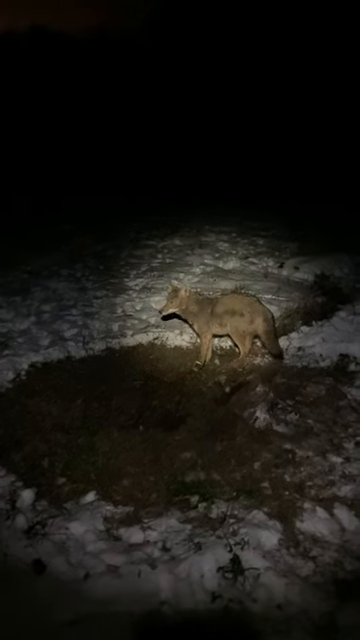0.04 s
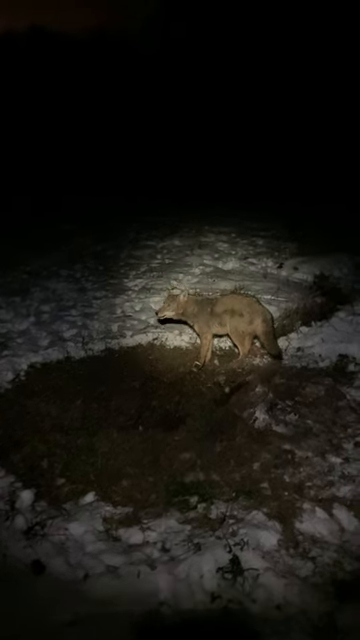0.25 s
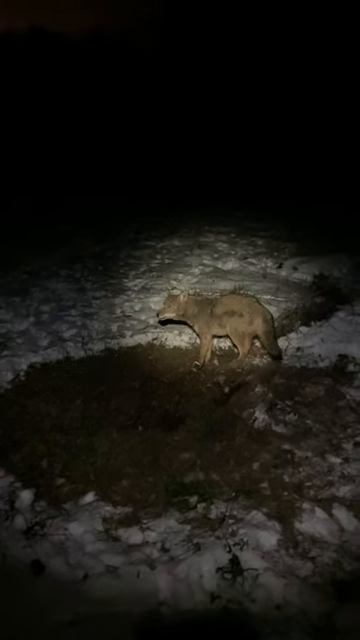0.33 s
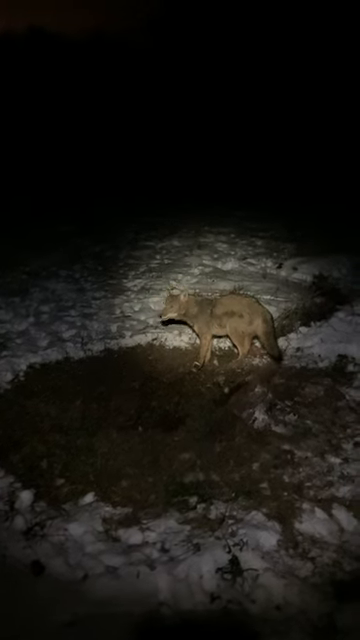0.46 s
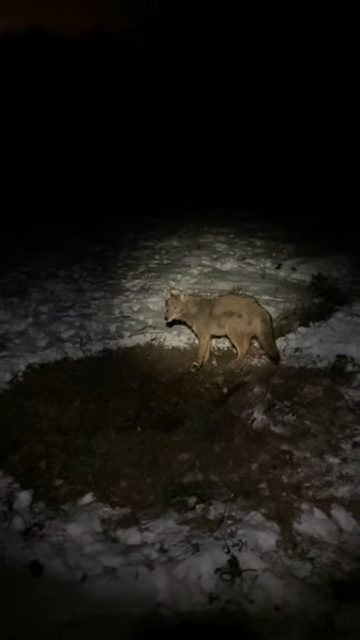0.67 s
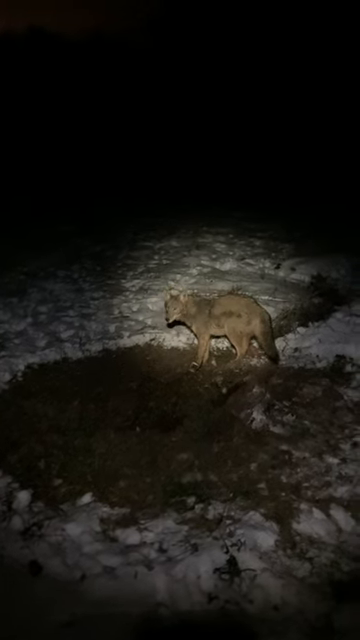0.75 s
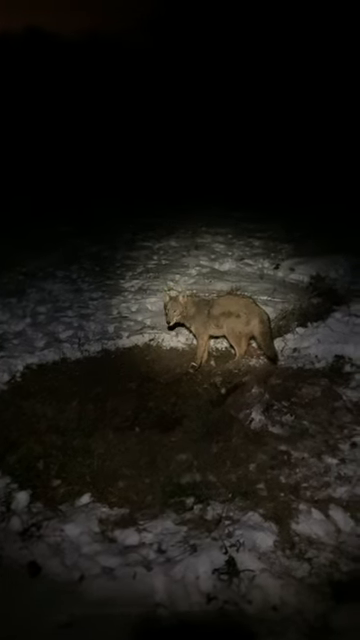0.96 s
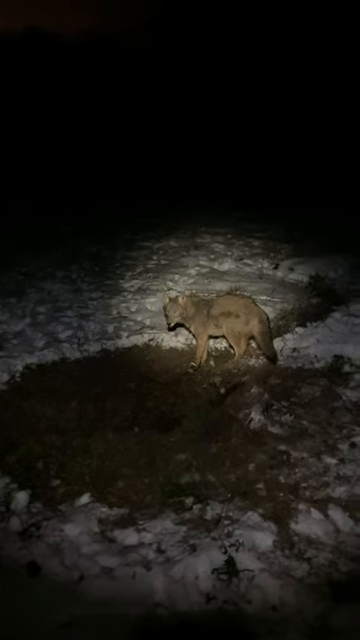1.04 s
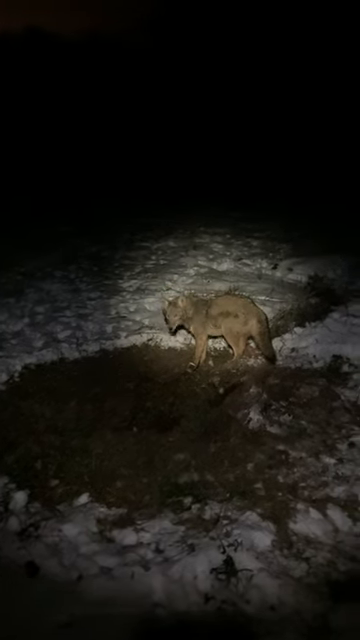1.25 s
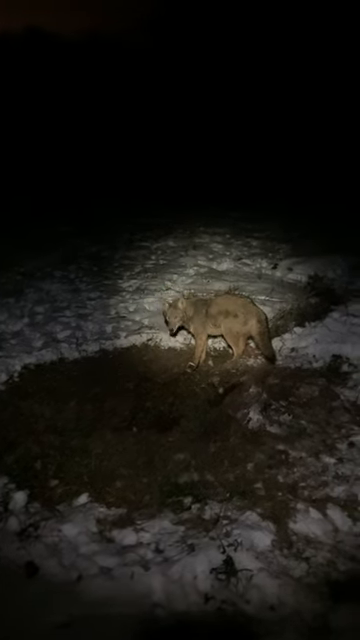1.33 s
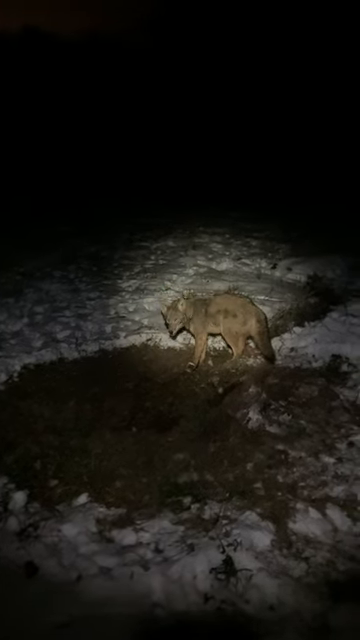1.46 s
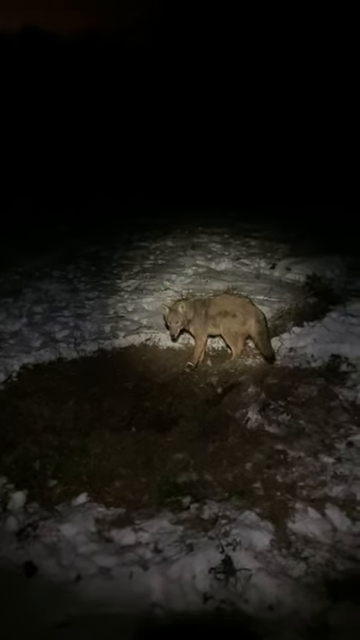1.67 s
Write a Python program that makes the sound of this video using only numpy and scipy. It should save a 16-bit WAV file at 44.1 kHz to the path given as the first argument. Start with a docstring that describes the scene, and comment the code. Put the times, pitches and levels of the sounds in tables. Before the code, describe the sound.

A coyote lets out a loud, raspy yip that falls into a thin howl and sinks to a faint hum. A second yip follows with a short trailing howl, echoing faintly over quiet open ground at night.

```python
"""Night on open ground: a quiet low rumble, and a distant ring dying in the air. A coyote barks twice,
its vocal folds driving throat and mouth. A low grunt breaks into a loud raspy yip, then clears into a thin
falling howl with a high whistle riding on it. The land returns a faint long echo while the howl sinks
to a closed-mouth hum. The hum lasts until the second grunt, whose yip has a soft low thud under it
and trails off in a short howl."""
import sys
import numpy as np
from scipy import signal
from scipy.fft import rfft, irfft, next_fast_len
from scipy.io import wavfile
from scipy.ndimage import uniform_filter1d, minimum_filter1d

SR = 44100
rng = np.random.default_rng(int(sys.argv[2]) if len(sys.argv) > 2 else 0)


def file_out(sig):
    """Save sig as 16-bit WAV at sys.argv[1]."""
    # one column per channel
    cols = np.atleast_2d(sig).T
    # limit, then scale
    lim = np.clip(cols, -1, 1)
    pcm = np.round(lim * 32767).astype(np.int16)
    wavfile.write(sys.argv[1], SR, pcm)


N = 74970
T = np.arange(N) / SR
FFT_SIZE = 2 * next_fast_len(N)
HZ = np.maximum(np.arange(FFT_SIZE // 2 + 1) * SR / FFT_SIZE, 1)


def from_db(db):
    """Decibels to gain."""
    return 10 ** (np.asarray(db) / 20)


def unit_rms(x):
    """Scale to unit power."""
    return x / np.sqrt(np.mean(x ** 2) + 1e-20)


def at_hz(curve, hz):
    """Read a curve on a log-frequency axis."""
    freq_hz, value = np.transpose(curve)
    return np.interp(np.log(hz), np.log(freq_hz), value)


def filtered(x, response):
    """Apply a frequency response."""
    return irfft(rfft(x, FFT_SIZE) * response)[..., :N]


def noise(colour_db, pulsing=1):
    """Unit-power noise, pulsed at its source if wished, then coloured."""
    return unit_rms(filtered(rng.standard_normal(N) * pulsing, from_db(colour_db)))


def drift(rate_hz):
    """Unit-power random wander, mostly slower than the given rate."""
    return noise(-20 * np.log10(1 + (HZ / rate_hz) ** 2))


def phase_of(hz):
    """Running phase of a gliding pitch."""
    return 2 * np.pi * np.cumsum(hz) / SR


# Colour of the night air: freq_hz, relative_db
NIGHT_COLOUR = [(20, -19), (40, -9), (65, -0.5), (125, -17), (230, -18), (500, -11), (1000, -26),
                (2000, -41), (4000, -43.5), (8500, -41), (15000, -53)]
def night_rumble(level_db=-65.5):
    """A steady, bass-heavy bed of noise."""
    return from_db(level_db) * noise(at_hz(NIGHT_COLOUR, HZ))


# Colour of the distant ring: freq_hz, relative_db
RING_COLOUR = [(250, -38), (400, -20.5), (470, 3), (540, -17.5), (720, -24.5), (850, -8), (950, -32),
               (1140, -23), (1400, -45), (4000, -73)]
def distant_ring(level_db=-67.5, t60_s=3.9):
    """Narrow bands of noise, already in the air at the start and fading."""
    return from_db(level_db - 60 * T / t60_s) * noise(at_hz(RING_COLOUR, HZ))


# Resonances of the open throat and mouth: freq_hz, gain_db
OPEN_THROAT = [(200, -34), (400, -19), (560, -8.5), (720, 0), (950, -3.5), (1130, 7), (1280, -9.5),
               (1450, -1), (1650, 0), (1780, -1.5), (1950, -0.5), (2250, -11), (2520, -24.5), (2850, -12.5),
               (3100, -28), (3400, -19.5), (4300, -30.5), (5100, -29.5), (5700, -29), (6700, -19),
               (7700, -29.5), (8900, -21.5), (11000, -35.5), (15500, -41)]
# Resonances with the mouth narrowed for the howl: freq_hz, gain_db
HOWL_MOUTH = [(460, 8), (600, -3), (740, 4), (930, 7), (1020, -5.5), (1100, -16.5), (1260, -15.5),
              (1450, -4.5), (1620, 3), (1780, -8), (1930, -3.5), (2200, -31), (2550, -32), (2870, -20.5),
              (3250, -42.5), (4500, -50.5), (6000, -31.5)]
# Colour of the rasp before the throat: freq_hz, gain_db
RASP_COLOUR = [(60, -12.5), (200, -3.5), (500, 8.5), (900, -3), (1600, 1), (3000, 0), (15000, 0.5)]
WAVER_DEPTH, WAVER_HZ = .008, 35   # slow unsteadiness of pitch
JITTER_DEPTH, SHIMMER_DB, JITTER_HZ = .07, 2.5, 223   # uneven pitch and level at full roughness
FLUTTER_DB, FLUTTER_HZ = 2.5, 25.03   # each overtone flickers on its own
CHEST_HZ, MOUTH_RANGE_DB, RASP_PULSE_DEPTH = 720, 13.5, 0.59
def voice(gesture, fall_db_per_octave, chest_db, mouth_opens_db):
    """Vocal folds drive the throat; as they roughen, cycles turn uneven and rasp replaces overtones."""
    time_s, *columns = np.transpose(gesture)
    pitch_hz, fundamental_db, overtones_db, roughness = [np.interp(T, time_s, c) for c in columns]
    roughness = np.clip(roughness, 0, .95)
    gate = np.clip(np.minimum(T - time_s[0], time_s[-1] - T) / .004 + 1, 0, 1)
    # The mouth opens as the overtones grow louder.
    openness = np.clip((overtones_db - mouth_opens_db) / MOUTH_RANGE_DB, 0, 1)
    phase = phase_of(pitch_hz * (1 + WAVER_DEPTH * drift(WAVER_HZ)))
    jitter = phase_of(pitch_hz * JITTER_DEPTH * roughness * drift(JITTER_HZ))
    overtones, power = 0, 0
    for harmonic in range(2, 13):
        hz = harmonic * pitch_hz
        mouth_db = openness * at_hz(OPEN_THROAT, hz) + (1 - openness) * at_hz(HOWL_MOUTH, hz)
        low_lift_db = chest_db * np.exp(-(hz / CHEST_HZ) ** 2)
        gain = from_db(mouth_db - fall_db_per_octave * np.log2(harmonic) + low_lift_db)
        flicker = np.interp(T * FLUTTER_HZ, np.arange(200), rng.standard_normal(200))
        partial = np.cos(harmonic * (phase + jitter) + rng.uniform(0, np.pi))
        overtones += gain * from_db(FLUTTER_DB * flicker) * partial
        power += gain ** 2 / 2
    rasp_db = at_hz(OPEN_THROAT, HZ) + at_hz(RASP_COLOUR, HZ) + chest_db * np.exp(-(HZ / CHEST_HZ) ** 2)
    rasp = noise(rasp_db, pulsing=1 + RASP_PULSE_DEPTH * np.cos(phase))
    edge = np.sqrt((1 - roughness ** 2) / power) * overtones + roughness * rasp
    shimmer = from_db(SHIMMER_DB * roughness * drift(JITTER_HZ))
    fundamental = np.sqrt(2 * shimmer) * np.sin(phase + .35 * jitter)   # steadier than its overtones
    return gate * (from_db(fundamental_db) * fundamental + from_db(overtones_db) * shimmer * edge)


# One gesture per grunt: time_s, pitch_hz, fundamental_db, overtones_db, roughness (0-1)
GRUNT_GESTURES = [
    [(.183, 145, -54.5, -68.5, .9), (.194, 165.2, -42, -55.5, 0.8), (.203, 173, -31, -40, 0.7),
     (.22, 204, -54.5, -45.5, .8)],
    [(1.37, 115.1, -51.5, -66.5, 0.8), (1.412, 129.8, -38, -48.5, 0.2), (1.435, 177.6, -31, -34.5, .75),
     (1.458, 218.9, -31, -30.5, 0.6), (1.472, 220, -53.5, -44.5, .7)],
]
def grunts():
    """A rough, chesty rise in pitch leads into each yip."""
    return sum(voice(gesture, fall_db_per_octave=4, chest_db=25.5, mouth_opens_db=-42.5)
               for gesture in GRUNT_GESTURES)


# First yip, howl and hum: time_s, pitch_hz, fundamental_db, overtones_db, roughness (0-1)
FIRST_YIP = [(.204, 430.2, -39.5, -38, .8), (.211, 463.6, -22.5, -23.5, 0.57), (.23, 482.7, -10, -13, 0.41),
             (.24, 515.6, -12.5, -13, .65), (.252, 534.2, -13.5, -16, .6), (.274, 571.3, -21.5, -14.5, .17),
             (.286, 535.7, -22.5, -20.5, .25), (.298, 498, -24.5, -33, 0.26),
             (.322, 464.5, -35.5, -30.5, .05), (.35, 442, -42.5, -41, 0.05),
             (.39, 396.6, -52.5, -41.5, 0.01), (.48, 375.3, -57, -45, 0.04), (.67, 353, -61.5, -48.5, 0.06),
             (.75, 333.9, -54, -61, .05), (.91, 305.6, -50, -59, .05), (1.0, 243, -43, -65, .05),
             (1.06, 235.4, -43.5, -66.5, .05), (1.36, 232.6, -42.5, -70.5, .05),
             (1.39, 207.2, -49.5, -73, .05)]
# Second yip and short howl: time_s, pitch_hz, fundamental_db, overtones_db, roughness (0-1)
SECOND_YIP = [(1.455, 420.5, -37, -39, .7), (1.466, 469.2, -22, -20, .45), (1.482, 481.7, -11, -17.5, 0.67),
              (1.497, 504, -26, -16.5, .9), (1.512, 495.2, -23.5, -22, 0.57), (1.528, 471, -24, -27, .5),
              (1.541, 429.6, -25, -35, 0.068), (1.58, 389.6, -45, -40, .03), (1.62, 353.7, -61, -48, 0.039),
              (1.665, 324.6, -58, -54, .03), (1.7, 326, -50, -54.5, 0.028)]
def yips_and_howls():
    """Each yip bursts from an open mouth, then clears and falls as the mouth narrows."""
    return sum(voice(gesture, fall_db_per_octave=4.5, chest_db=0, mouth_opens_db=-31)
               for gesture in (FIRST_YIP, SECOND_YIP))


# Path of the whistle riding on the voice: time_s, pitch_hz, level_db
WHISTLE_PATH = [(0.322, 5900, -71.5), (.55, 5700, -78), (.66, 5930, -80), (.92, 5614, -71.5),
                (1.05, 5350, -81), (1.39, 5250, -90), (1.43, 5100, -59), (1.459, 5320, -61),
                (1.472, 5400, -35), (1.49, 5590, -60), (1.539, 5400, -77.5), (1.7, 5400, -86)]
def whistle(width_hz=90):
    """A thin unsteady whistle far above the howl, flaring on the second yip."""
    time_s, pitch_hz, level_db = np.transpose(WHISTLE_PATH)
    phase = phase_of(np.interp(T, time_s, pitch_hz))
    tone = drift(width_hz) * np.cos(phase) + drift(width_hz) * np.sin(phase)
    return (T > time_s[0]) * from_db(np.interp(T, time_s, level_db)) * unit_rms(tone)


def scatter(x, t60_s, build_s, gain_db):
    """Countless small reflections that build up and die away."""
    tail = rng.standard_normal(N) * (1 - np.exp(-T / build_s)) * from_db(-60 * T / t60_s)
    return filtered(x, rfft(unit_rms(tail) / np.sqrt(N), FFT_SIZE) * from_db(gain_db))


# Colour of the land's echo: freq_hz, gain_db
ECHO_COLOUR = [(100, -17.5), (300, -5.5), (420, -5), (540, 0.5), (800, -0.5), (1000, -12.5), (1150, -5.5),
               (1400, -8), (1800, -13), (2400, -29), (3000, -23.5), (8000, -14), (15000, -24)]
def land_echo(coyote, send_db=-38):
    """The land returns the barks as a faint long tail."""
    return scatter(coyote, t60_s=3.2, build_s=0.085, gain_db=send_db + at_hz(ECHO_COLOUR, HZ))


# Colour of the thud under the second bark: freq_hz, relative_db
THUD_COLOUR = [(20, -2.5), (55, 0), (110, -8), (200, -16.5), (400, -31), (1500, -94)]
def thud(start_s=1.492, level_db=-39.5, attack_s=0.0037, decay_s=0.035):
    """A dull puff of bass that dies quickly, different in each ear."""
    age_s = np.maximum(T - start_s, 0)
    puff = np.array([noise(at_hz(THUD_COLOUR, HZ)) for _ in range(2)])
    return from_db(level_db) * puff * (1 - np.exp(-age_s / attack_s)) * np.exp(-age_s / decay_s)


# Phase between the two microphone ports: freq_hz, left_lead_rad
STEREO_PHASE = [(100, 0.5), (250, -1), (480, -1.6), (860, -3), (1250, -3.5), (1800, -4), (2600, -4),
                (2850, -6), (3200, -11), (3900, -9), (5400, -10.5), (6100, -8.5), (7900, -7), (9400, -5.5),
                (11000, -3.5), (12800, -3), (14000, -0.5)]
# Balance between the ports: freq_hz, left_minus_right_db
STEREO_BALANCE = [(100, 1), (240, 0.5), (340, -8.5), (490, -3), (620, 0), (1600, 1), (2700, -3), (6000, .5)]
def microphone_ports(x):
    """Sound from the animal's direction reaches the two ports with different phase and strength."""
    left = from_db(at_hz(STEREO_BALANCE, HZ) / 2) * np.exp(.5j * at_hz(STEREO_PHASE, HZ))
    return filtered(x, np.array([left, 1 / left]))


def scene():
    """The coyote and nearby ground in front; echo, ring and rumble spread wide around them."""
    coyote = yips_and_howls() + whistle() + grunts()
    ground = scatter(coyote, t60_s=0.22, build_s=0.0072, gain_db=-22)
    mid, side = [land_echo(coyote) + distant_ring() + night_rumble() for _ in range(2)]
    ambience = 0.77 * mid + 0.78 * side * np.array([[1], [-1]])
    return microphone_ports(coyote + ground) + thud() + ambience


CEILING, LIMITER_S, CUTOFF_HZ = .88, .004, 16100
def record(dry):
    """A fast limiter eases the loudest peaks; the top is cut steeply."""
    window = int(LIMITER_S * SR)
    allowed_gain = CEILING / np.maximum(np.abs(dry).max(axis=0), CEILING)
    gain = uniform_filter1d(minimum_filter1d(allowed_gain, window), window)
    high_cut = signal.cheby2(12, 70, CUTOFF_HZ, fs=SR, output="sos")
    return signal.sosfilt(high_cut, dry * gain)


dry = scene()
out = record(dry)
file_out(out)
```